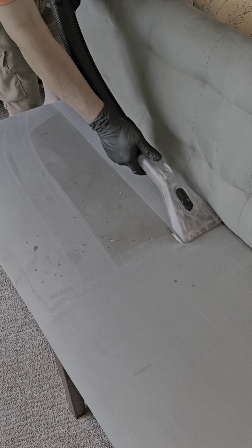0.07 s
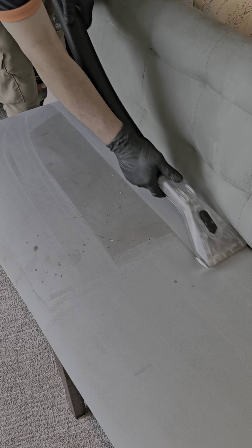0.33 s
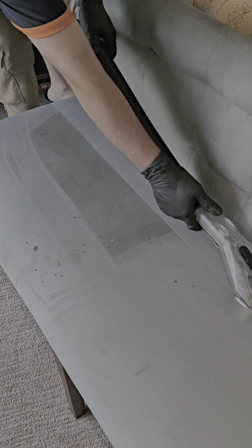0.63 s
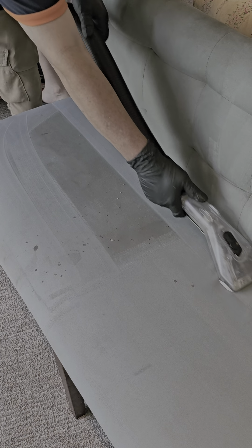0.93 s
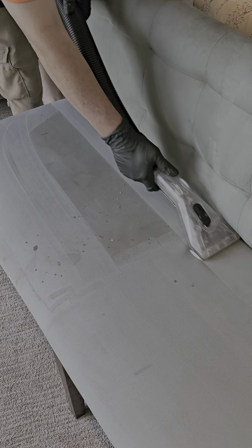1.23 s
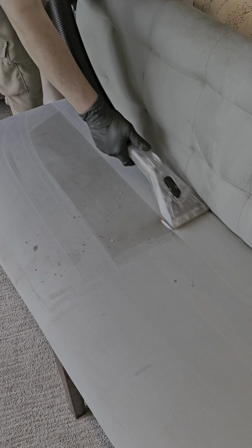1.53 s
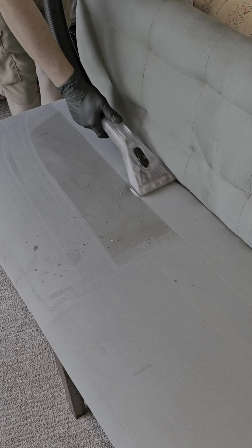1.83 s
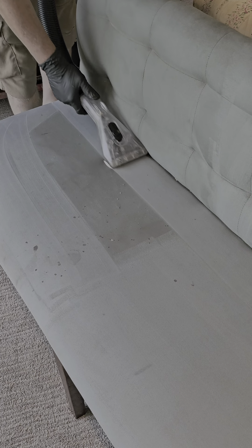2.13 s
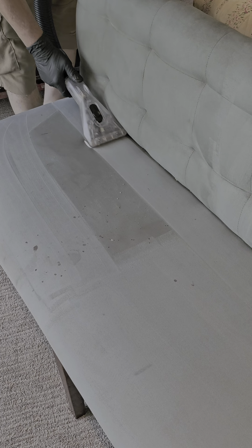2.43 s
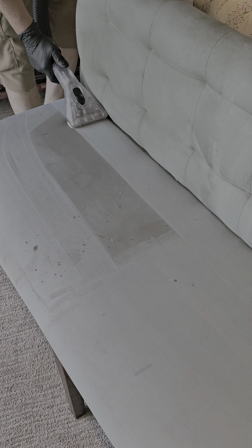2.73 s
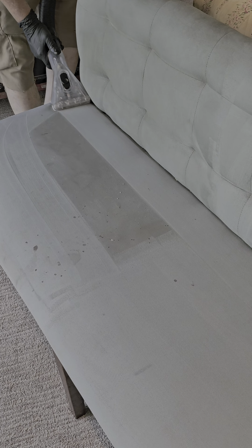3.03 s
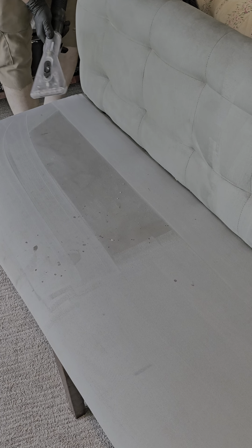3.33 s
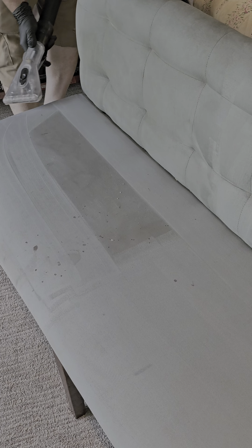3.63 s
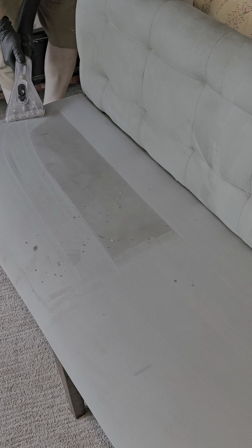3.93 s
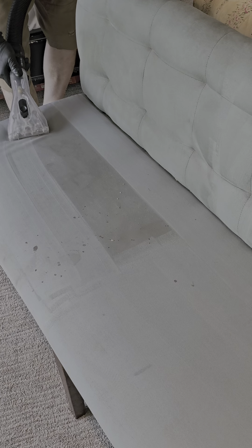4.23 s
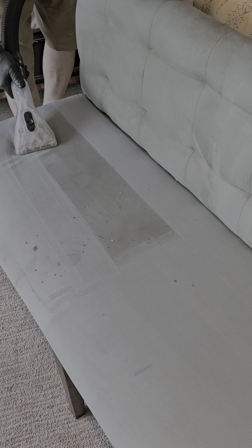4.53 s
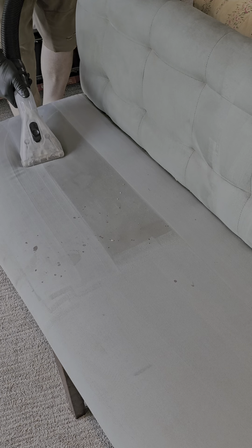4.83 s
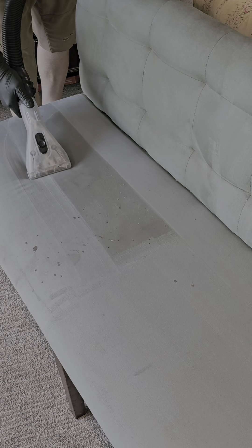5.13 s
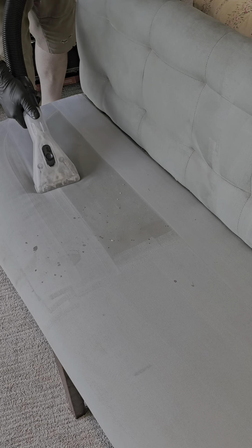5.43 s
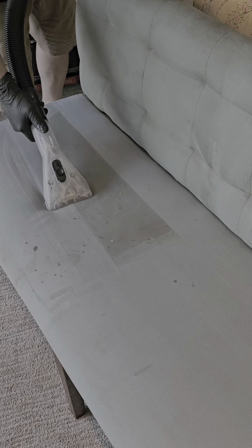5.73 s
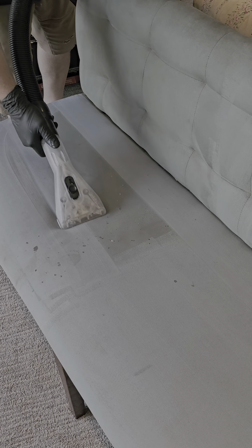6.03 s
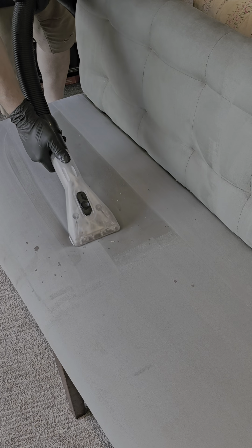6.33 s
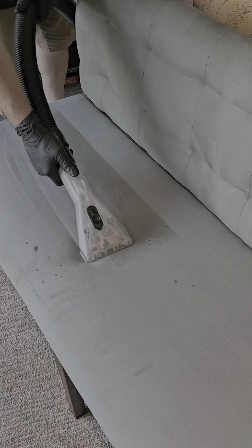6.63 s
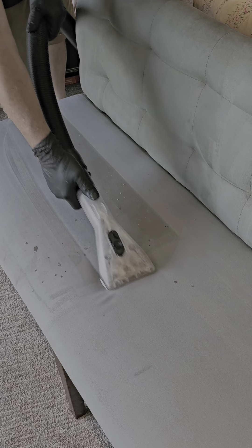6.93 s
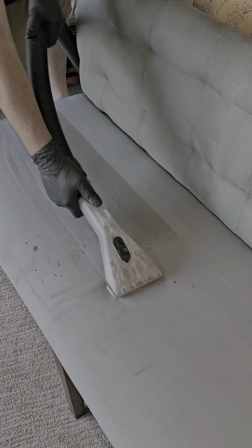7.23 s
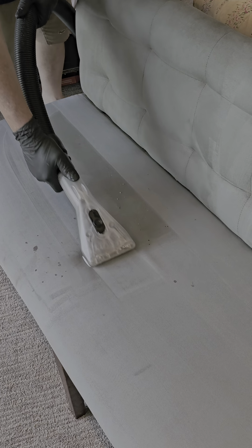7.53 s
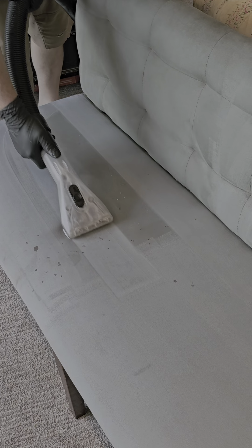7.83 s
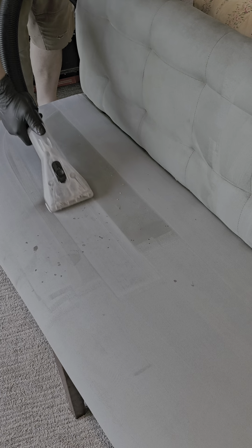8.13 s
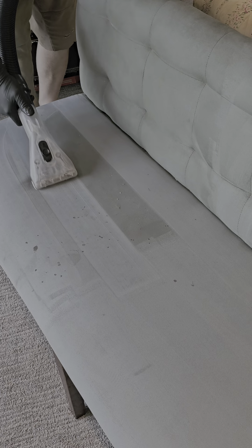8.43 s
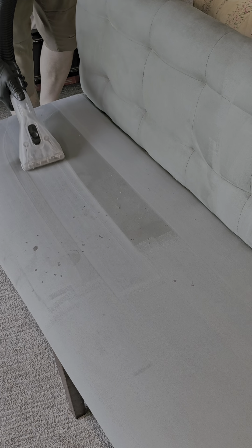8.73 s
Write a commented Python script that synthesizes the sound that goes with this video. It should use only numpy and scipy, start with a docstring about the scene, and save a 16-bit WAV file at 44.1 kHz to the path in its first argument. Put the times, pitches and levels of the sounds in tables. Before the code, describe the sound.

A hand-held suction nozzle hisses continuously on a damp fabric sofa seat, nearby and slightly left, with a thin high whistle and fine ticks of water inside. Its vacuum unit drones faintly across the living room throughout. The opening push has a brief spit of air at 0.25 seconds and ends with a hollow smack at 0.9, turning into a pull. The hose gives a faint hollow bump at 2.1, and the whistle grows around 3. At 3.3 the nozzle lifts with a puff and air rushes in freely, lower and more open, until it lands with a slap and a soft thump at 3.9. A long push follows with a leaky, slowly shifting hiss. From 7.3 seconds a last pull slurps hard, louder and brighter, and the suction carries on to the end at about 8.8 seconds.

```python
"""A hand-held suction nozzle works along a damp fabric seat, with its vacuum unit droning across the room.
First it is pushed, then pulled: air hisses through its slot and the cloth, its lip whistles thinly and
drops tick inside. At 2.1 s the hose bumps the seat. At 3.3 s the nozzle lifts and air rushes in freely,
until it lands with a slap and a soft thump at 3.9 s. A long push with a leaking lip follows, and from
7.3 s a last pull slurps hard."""
import sys
import numpy as np
from scipy import signal
from scipy.fft import rfft, irfft, next_fast_len
from scipy.io import wavfile
from scipy.ndimage import map_coordinates

SR = 44100
rng = np.random.default_rng(int(sys.argv[2]) if len(sys.argv) > 2 else 0)


def inscribe(sig):
    """Save sig as 16-bit PCM at rate SR to the path in sys.argv[1].

    A 1-D sig is mono; a 2-D sig holds one channel per row.
    Samples are clipped to [-1, 1] before scaling.
    """
    pcm = np.round(np.clip(np.atleast_2d(sig).T, -1, 1) * 32767)
    wavfile.write(sys.argv[1], SR, pcm.astype(np.int16))


N = 387198
TIME = np.arange(N) / SR
FFT_SIZE = next_fast_len(N, real=True)
FREQS = np.maximum(np.fft.rfftfreq(FFT_SIZE, 1 / SR), 1)

# Each hand move (push, pull, lift, set down, push, pull) shares the air anew among its ways in.
# Columns: start t/s; base level/dB of open mouth, leaking lip, slot, spray, cloth weave, whistle, sizzle;
# mid-move swell of the fine hiss/dB, change of the leak over the move/dB, change of the unit's roar/dB
MOVES = [(0.0, -44.5, -42, -31.5, -32, -29.8, -36, -46, -1.2, -1.5, 0.5),
         (0.88, -46.5, -42, -32.5, -31.5, -30.5, -36.5, -35, 2, -2, -2.5),
         (3.3, -38, -35, -28, -33.5, -38, -41, -40, -0.5, -2, 2),
         (3.93, -53.5, -40.5, -29.5, -30, -31, -36, -34, -2.5, -1, -3),
         (4.21, -47, -34.5, -29, -33.5, -32.5, -41, -44.5, 1, -1, 2.1),
         (7.31, -50, -30.5, -27, -27, -30, -39, -40, 0, -1.2, -0.5)]


def nozzle(flow):
    """The main hiss: air swirls in along five paths and rings in the head's narrow spaces."""
    # tone colour of each air path: f/Hz, level/dB
    mouth = [(150, -42), (400, -7.5), (515, -2), (610, -4), (740, -2.5), (900, 0), (1050, -2.5),
             (1330, 2.5), (1750, -3.5), (2150, -1.5), (2500, -25)]
    lip = [(700, -43), (1080, -10), (1290, -2.5), (1700, -0.5), (2100, 3.5), (2450, 2.5), (2800, 3.5),
           (3200, 0.5), (4600, -44)]
    slot = [(1700, -26), (2600, -6.5), (3100, 2.5), (3600, 5), (3900, 4), (4370, 7), (4750, 4), (5400, 4.3),
            (5850, -8), (6400, -4.5), (8000, -10.5)]
    spray = [(4300, -32), (5450, 0.5), (5850, 0.7), (6350, 3.1), (6850, -1), (7400, 3.1), (8300, 2.5),
             (9400, 2.5), (10600, -2), (12500, 2), (15000, -23)]
    weave = [(7000, -25.5), (9500, -3), (10900, -1), (12200, 2.5), (13000, 1), (14000, 1.5), (14700, 6),
             (15750, 2), (16500, -20)]
    # the gap under the lip and the slot ring differently as the head tilts:
    # t/s, gap f/Hz, slot f/Hz, gap's ring above the leak/dB
    tilt = [(0, 2108, 4487, -5), (.45, 2084, 4817, -7), (.8, 2100, 5180, -17), (1.0, 2087, 4710, -5),
            (1.3, 1627, 4976, -13), (2.0, 1586, 4720, -7), (2.5, 2000, 4405, -7), (3.2, 2100, 4372, -10),
            (3.4, 1600, 3436, -7.5), (3.85, 1560, 3250, -13), (4.05, 2200, 4600, -11),
            (4.35, 2230, 4195, -10), (4.8, 2141, 3742, -2), (5.4, 1899, 3903, -5), (6.0, 1614, 4413, -5.5),
            (6.5, 1589, 4302, -6), (7.1, 1434, 3845, -8.5), (7.25, 1430, 3854, -9),
            (7.35, 2250, 4298, -9.5), (7.9, 2220, 4410, -13), (8.35, 1989, 4510, -3),
            (8.78, 2057, 4560, -7)]
    # the gap's ringing notes, which glide together: multiple of its pitch, width/Hz, level/dB
    gap_notes = [(1, 500, 0.5), (1.9, 565, -2), (2.73, 600, -5.5)]
    # pitch of the lip's whistle, higher on a push: t/s, f/Hz
    whistle_pitch = [(0, 11620), (.8, 11660), (1.2, 11470), (3.2, 11440), (5.0, 11550), (8.78, 11500)]
    mouth_db, lip_db, slot_db, spray_db, weave_db, whistle_db, sizzle_db = flow
    gap_hz, slot_hz, gap_ring_db = in_time(tilt)
    whistle_hz, = in_time(whistle_pitch)
    # pitches wander as the lip rides over uneven cloth
    gap_hz = gap_hz * (1 + .022 * drift(rate_hz=4)[0])
    sizzle_hz = 10290 * (1 + .025 * drift(rate_hz=4)[0])
    # a leaking lip damps the slot's ring; more ring means less plain hiss
    ring_db = -0.7 * (lip_db - lip_db.mean())
    air = air_path(mouth, mouth_db + 0.6, flutter_db=1.54)
    air += air_path(lip, lip_db - 0.3, flutter_db=0.9)
    air += air_path(slot, slot_db - 3.0 - .5 * ring_db, flutter_db=0.78)
    air += air_path(spray, spray_db + 0.25, flutter_db=0.5)
    air += air_path(weave, weave_db + 2.0, flutter_db=0.0)
    for multiple, width_hz, db in gap_notes:
        air += ringing_air(multiple * gap_hz, width_hz, lip_db + gap_ring_db + db)
    air += ringing_air(slot_hz, width_hz=2000, level_db=slot_db - 5.5 + ring_db)
    # the sealed lip gives a thin whistle with a broad sizzle just below it
    air += ringing_air(whistle_hz, width_hz=380, level_db=whistle_db)
    air += ringing_air(sizzle_hz, width_hz=1400, level_db=sizzle_db)
    air[0] += from_db(spray_db - 4.0) * droplets(per_s=300, spread_db=4.5)  # row 0 is the direct sound
    return air


def airflow(reach):
    """How loud each air path, the whistle and the sizzle are as the hand moves, in dB."""
    # the lip presses shut as a push ends or the head lands: t/s, level change/dB, half length/s
    chokes = [(0.808, -3, 0.041), (4.07, -3.5, 0.083), (7.273, 0, .018)]
    # the lip's grip on the cloth changes briefly, mostly lifting the whistle:
    # t/s, level change/dB, half length/s
    flares = [(.3, 3, .1), (.73, 5, 0.09), (1.418, 3.5, 0.11), (1.85, 3, .1), (2.311, 2, .08),
              (2.57, -3, .08), (2.9, 7.5, .09), (3.073, 6, 0.046), (3.2, 8.5, 0.092), (4.231, 7, .07)]
    starts, *paths, swells, leak_changes, _ = np.transpose(MOVES)
    levels_db = [20 * np.log10(settled(from_db(db))) for db in paths]
    mouth, lip, slot, spray, weave, whistle, sizzle = levels_db
    move_edges_s = np.append(starts, TIME[-1])
    progress = np.interp(TIME, move_edges_s, np.arange(len(MOVES) + 1)) % 1  # 0 to 1 in each move
    swell = settled(swells) * np.sin(np.pi * progress)
    leak = settled(leak_changes) * (progress - .5)
    wobble = 0.67 * drift(rate_hz=2.7)[0]  # an unsteady hand trades air between leaks and weave
    choke = humps(chokes)
    stretch = reach - .5  # its factors below are dB over the whole reach
    grip = swell - 0.5 * stretch + humps(flares)
    return (mouth + 2 * stretch + leak - wobble,
            lip - 0.5 * stretch + leak + choke - wobble,
            slot + 3 * stretch + 0.18 * leak + .5 * choke - wobble,
            spray + 2 * stretch + swell + choke,
            weave + swell + wobble,
            whistle + grip,
            sizzle + .5 * grip)


def air_path(colour, level_db, flutter_db):
    """Swirling air whose loudness flutters as water passes through it."""
    return from_db(level_db + flutter_db * drift(rate_hz=25)) * noise(from_db(in_hz(colour)))


def ringing_air(centre_hz, width_hz, level_db):
    """Air ringing in a small space: a band of noise around a gliding pitch."""
    tone = np.cos(2 * np.pi * np.cumsum(centre_hz) / SR)
    return from_db(level_db) * rms_one(noise(bell(0, width_hz)) * tone)


def droplets(per_s, spread_db):
    """Drops of uneven size hit the inside of the plastic head as short bright ticks."""
    sizes = from_db(spread_db * rng.standard_exponential(N).clip(max=4))
    signs = rng.choice([-1, 1], N)
    hits = rng.random(N) < per_s / SR
    bright_band = signal.butter(1, [2500, 14000], "band", fs=SR, output="sos")
    return rms_one(signal.sosfilt(bright_band, sizes * signs * hits))


def seal_breaks():
    """As the nozzle turns or lifts, air bursts in under the lip: a hollow smack and a hiss in the slot."""
    # t/s, smack level/dB, smack fade/s, hiss level/dB, hiss rise/s, hiss fade/s
    breaks = [(.25, -45, .02, -24, .006, 0.023), (.892, -23, 0.021, -28.5, 0.0087, 0.14),
              (3.315, -29.5, 0.087, -28.5, 0.01, 0.049), (7.305, -42, .1, -27.5, 0.089, 0.35)]
    # how the head rings in a smack: f/Hz, width/Hz, level/dB
    head_notes = [(1510, 500, -2.5), (2250, 260, 0.5), (3220, 570, -5), (4100, 450, 0)]
    smack = sum(puff(s, db, fade_s, rise_s=0.0049) for s, db, fade_s, *_ in breaks)
    hiss = sum(puff(s, db, fade_s, rise_s) for s, _, _, db, rise_s, fade_s in breaks)
    head = sum(from_db(db) * bell(hz, width) for hz, width, db in head_notes)
    return smack * noise(head) + hiss * noise(bell(hz=4530, width_hz=2200))


def slap():
    """The landing head claps the damp cloth, one edge after the other."""
    # the two claps: t/s, level/dB, fade/s
    claps = [(3.926, -24, 0.0053), (3.938, -33, 0.01)]
    return sum(puff(*clap, rise_s=0.0011) for clap in claps) * noise(bell(hz=566, width_hz=1400))


def thumps():
    """The cushion gives way under the nozzle with short dull puffs."""
    # soft knocks on the cushion: t/s, level/dB, fade/s
    knocks = [(3.308, -53, .1), (3.923, -36, 0.023), (4.06, -54, .13), (7.14, -54, .2), (7.3, -52, 0.07)]
    # tone colour of a knock: f/Hz, level/dB
    colour = [(25, -4), (60, 2), (100, 15), (160, -3), (300, 2), (540, -15), (900, -1), (2000, -38)]
    return sum(puff(*knock, rise_s=0.0055) for knock in knocks) * noise(from_db(in_hz(colour)))


def hose_bump():
    """The hose bumps the seat and gives one faint hollow note."""
    # the bump: t/s, level/dB, fade/s
    bump = (2.11, -49, 0.0598)
    return puff(*bump, rise_s=0.016) * noise(bell(hz=160, width_hz=32.2))


def vacuum_unit():
    """The distant blower roars dully and makes hose and room ring; its level shifts with each move."""
    # tone colour of the roar: f/Hz, level/dB
    colour = [(12, -38), (40, -22), (100, -9), (135, -24), (175, 1), (300, 4), (385, -6), (600, -8),
              (1000, -7), (2000, -21)]
    # ringing notes of hose and room: f/Hz, width/Hz, relative level/dB
    notes = [(59, 6, -74), (99.5, 17, -70), (168, 16, -67), (223.6, 19, -65.5), (298.7, 12, -63.5),
             (334, 26, -70.5), (355.6, 9.1, -67.5), (454, 26, -62), (517, 17, -66.5), (655, 14, -63.5),
             (720, 20, -64)]
    ringing = sum(from_db(db) * rms_one(bell(hz, width)) for hz, width, db in notes)
    roar = from_db(-58) * noise(from_db(in_hz(colour)))
    hum = from_db(-56) * noise(ringing)
    change_db = settled([move[-1] for move in MOVES])
    return from_db(change_db) * (roar + hum)


def motor():
    """Faint tones that waver together with the speed of the unit's motor."""
    # the motor's tones: f/Hz, level/dB
    tones = [(59, -74), (333.5, -63), (360.5, -66.5), (473.5, -61)]
    speed = 1 + 0.002 * drift(rate_hz=2.9)[0]
    turning_s = np.cumsum(speed) / SR
    return sum(from_db(db) * np.sqrt(2) * np.sin(2 * np.pi * (hz * turning_s + rng.random()))
               for hz, db in tones)


def furniture_echoes(sound, reach, count=6):
    """Quick echoes, left and right; their paths change with the reach, so ripples glide through the hiss."""
    lags_s = rng.uniform(.002, .014, (2, count))
    shifts_s = rng.uniform(-0.002, 0.002, (2, count))
    sides = [sum(delayed(sound, lag + shift * reach) for lag, shift in zip(lags, shifts))
             for lags, shifts in zip(lags_s, shifts_s)]
    return np.array(sides) / np.sqrt(count)


def settled(values, settle_s=0.059):
    """Hold one value for each move, gliding to the next as the lip settles."""
    glides = [np.clip((TIME - move[0]) / settle_s + .5, 0, 1) for move in MOVES[1:]]
    return values[0] + sum(step * glide for step, glide in zip(np.diff(values), glides))


def humps(rows):
    """Brief smooth rises or dips in level, in dB."""
    return sum(db * np.exp(-((TIME - s) / half_s) ** 2) for s, db, half_s in rows)


def puff(start_s, db, fade_s, rise_s):
    """Loudness of a short burst that rises and dies away."""
    age = np.maximum(TIME - start_s, 0)
    return from_db(db) * (1 - np.exp(-age / rise_s)) * np.exp(-age / fade_s)


def noise(gain, count=3):
    """Unrelated rows of coloured noise: by default the direct sound, room left and room right."""
    real, imaginary = rng.standard_normal((2, count, len(FREQS)))
    return rms_one(irfft((real + 1j * imaginary) * gain, FFT_SIZE)[:, :N])


def drift(rate_hz):
    """A slow random wander with a typical size of 1."""
    return noise(1 / (1 + (FREQS / rate_hz) ** 2), count=1)


def bell(hz, width_hz):
    """A peak around one frequency, 1 on top."""
    return 1 / (1 + ((FREQS - hz) / width_hz * 2) ** 2)


def filtered(x, gain):
    """Turn each frequency up or down by its gain."""
    return irfft(rfft(x, FFT_SIZE) * gain, FFT_SIZE)[..., :N]


def delayed(x, lag_s):
    """Play a sound late by a changing amount."""
    return map_coordinates(x, [(TIME - lag_s) * SR], order=3, mode="mirror")


def in_time(rows):
    """Join a table's points over time, one curve per value column."""
    s, *columns = np.transpose(rows)
    return [np.interp(TIME, s, column) for column in columns]


def in_hz(points):
    """Join a table's points over frequency."""
    hz, value = np.transpose(points)
    return np.interp(np.log(FREQS), np.log(hz), value)


def from_db(db):
    """Turn decibels into a gain to multiply by."""
    return 10 ** (np.asarray(db) / 20)


def rms_one(x):
    """Scale to an average strength (rms) of 1."""
    return x / np.sqrt(np.mean(x ** 2) + 1e-20)


def scene():
    """The sounds reach a left and a right microphone, both directly and by way of the living room."""
    # the nozzle's place: t/s, reach (0 far end of the seat, 1 arm stretched out)
    travel = [(0, 0.49), (.8, 0.94), (1.2, 0.82), (2.0, 0.36), (3.0, 0.021), (4.2, 0.032), (5.0, 0.17),
              (6.0, 0.448), (7.3, 1.0), (8.0, 0.63), (8.78, 0.33)]
    # part of the sound that comes by way of the room: f/Hz, share (0-1)
    room_part = [(60, 0), (130, 0.05), (250, 0.08), (600, 0.37), (1500, 0.39), (3500, 0.75), (8000, 0.69),
                 (15000, 1)]
    # part of the room's hiss that comes as distinct echoes: f/Hz, share (0-1)
    echo_part = [(900, 0.14), (2200, 0.54), (8000, 0.57)]
    # how much louder the left is than the right: f/Hz, level/dB
    balance = [(60, 0.5), (100, 1), (170, 2.5), (750, 3.5), (2000, 3.5), (3100, 2.5), (5000, 4),
               (6100, 2.5), (9000, 3), (15000, 2.5)]
    reach, = in_time(travel)
    air = nozzle(airflow(reach)) + seal_breaks()
    rumble = vacuum_unit() + thumps() + slap() + hose_bump()
    near = air[0] + rumble[0] + motor()
    right_lag_s = 0.00015 * (1 - reach)  # shrinks as the nozzle moves from the left to the middle
    direct = np.array([near, delayed(near, right_lag_s)])
    echo_share = np.clip(in_hz(echo_part), 0, 1)
    echoes = filtered(furniture_echoes(air[0], reach), np.sqrt(echo_share))
    room = echoes + filtered(air[1:], np.sqrt(1 - echo_share)) + rumble[1:]
    room_share = np.clip(in_hz(room_part), 0, 1)
    mix = filtered(direct, np.sqrt(1 - room_share)) + filtered(room, np.sqrt(room_share))
    side_db = in_hz(balance) * np.array([[.5], [-.5]])
    return filtered(mix, from_db(side_db))


def record(dry):
    """Each microphone opening colours the treble in its own way; the very top is cut steeply."""
    # peaks and dips of each opening: f/Hz, width/Hz, level/dB
    left = [(7130, 600, 2), (10040, 500, -5.5), (11000, 500, 2.5), (15600, 500, 3)]
    right = [(7200, 600, 1), (8450, 660, -7), (9240, 540, 2), (10300, 630, 5.5)]
    colour_db = [sum(db * bell(hz, width) for hz, width, db in side) for side in (left, right)]
    cutoff_hz = 15760
    top_cut = 1 / np.sqrt(1 + (FREQS / cutoff_hz) ** 1800)
    return filtered(dry, from_db(colour_db) * top_cut)


dry = scene()
out = record(dry)
inscribe(out)
```